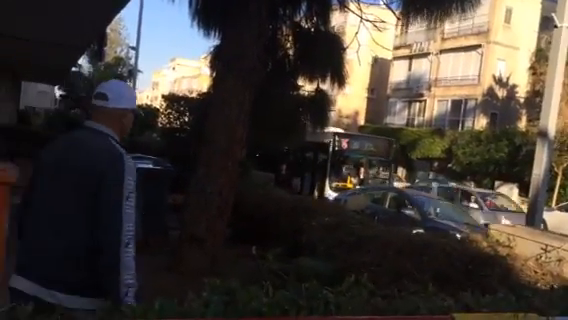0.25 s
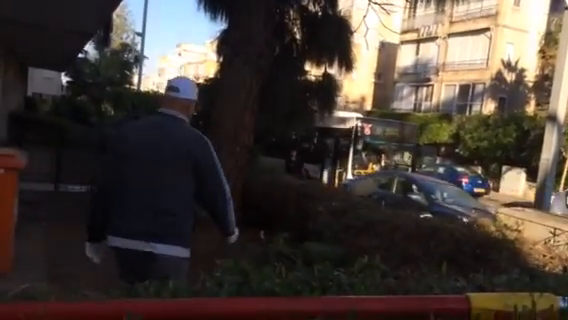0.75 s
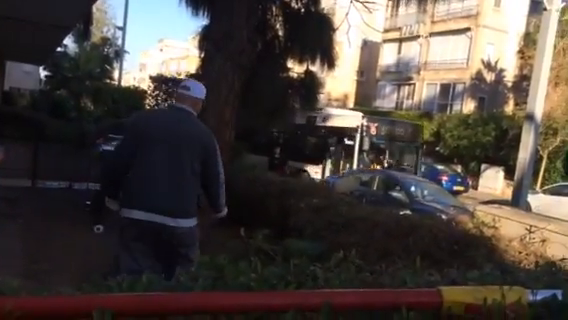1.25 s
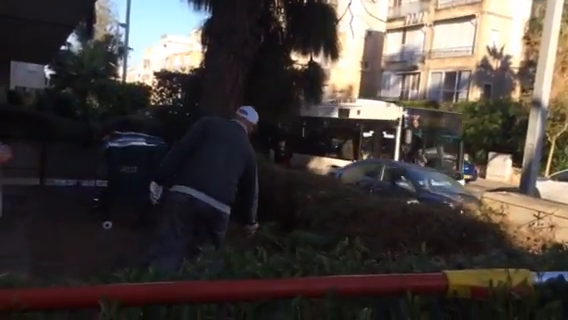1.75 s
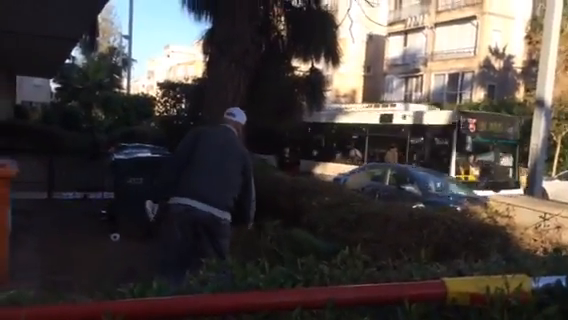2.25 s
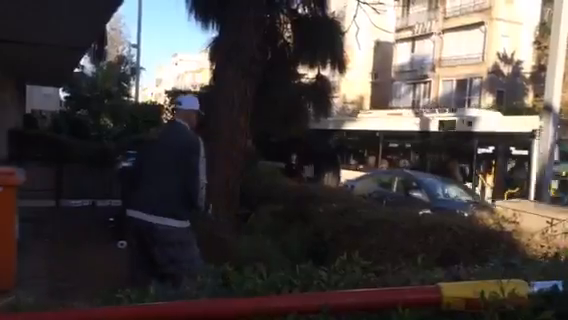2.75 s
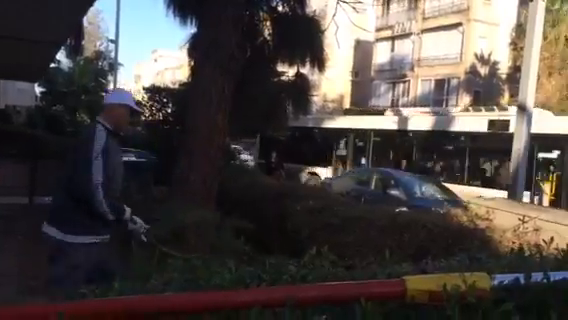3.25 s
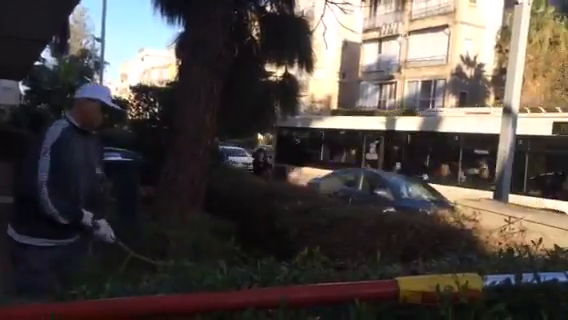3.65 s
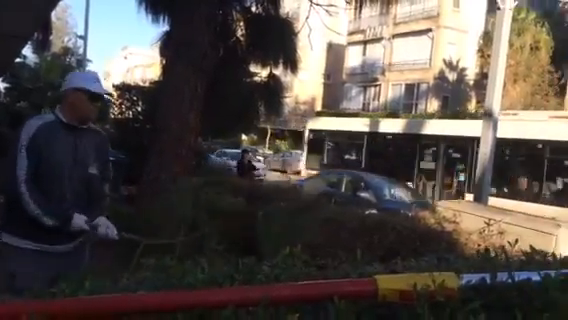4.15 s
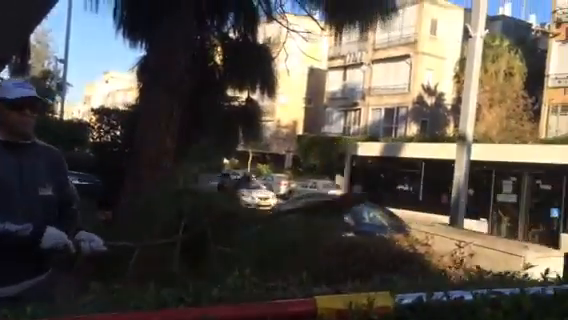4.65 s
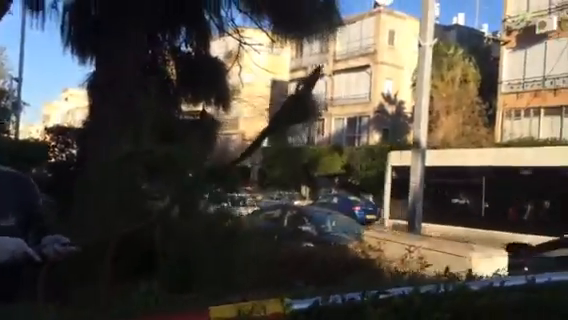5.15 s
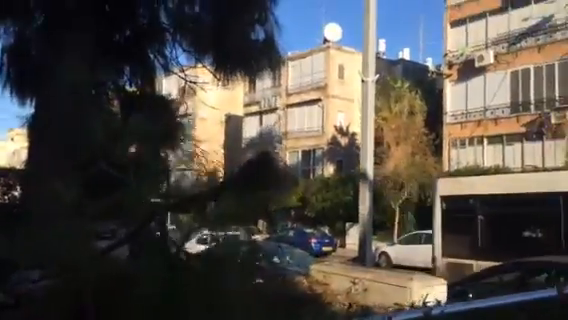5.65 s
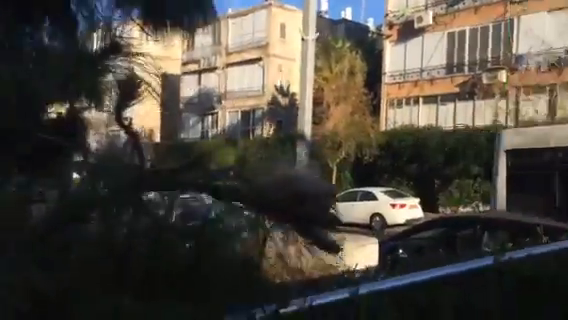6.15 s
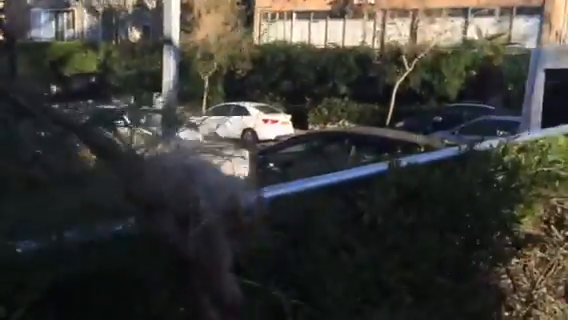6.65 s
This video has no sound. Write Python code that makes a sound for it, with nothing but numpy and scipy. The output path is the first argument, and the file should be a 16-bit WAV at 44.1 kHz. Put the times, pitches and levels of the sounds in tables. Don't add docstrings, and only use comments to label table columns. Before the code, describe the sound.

Outdoors on a city street, a diesel bus starts quietly, then its deep exhaust drone climbs in pitch and wavers through gear changes, with thin gear and intake whines. Dry twigs crack close to the microphone, mostly in the first couple of seconds. Car tyres hum and hiss, distant traffic washes underneath. Near six seconds a brake squeals briefly, then a brighter roar swells with small metallic knocks.

```python
import sys
import numpy as np
from scipy import signal
from scipy.io import wavfile
from scipy.ndimage import uniform_filter1d

SR = 44100
rng = np.random.default_rng(int(sys.argv[2]) if len(sys.argv) > 2 else 0)


def amplitude_ratio(level_db):
    exponent = np.asarray(level_db, float) / 20
    return 10 ** exponent


def log_audio(samples):
    frames = np.atleast_2d(samples).T
    limited = np.clip(frames, -1, 1)
    pcm = np.round(limited * 32767).astype(np.int16)
    wavfile.write(sys.argv[1], SR, pcm)


N = 304225
T = np.arange(N) / SR

# start_s, firing_hz, level_db
ENGINE = [(0, 27.5, -58), (.36, 28.5, -54), (.53, 38.52, -47), (.92, 50.93, -26.5), (1.1, 55.36, -33),
          (1.44, 58.3, -25), (2.31, 65.07, -23), (2.73, 65.84, -23.5), (3.05, 70.46, -30.5),
          (3.95, 72.2, -29), (4.44, 73.4, -31), (4.68, 69.5, -22.5), (5.0, 59.4, -32), (5.32, 58.45, -25),
          (5.78, 70.06, -25), (6.05, 58.2, -21), (6.28, 48.67, -32.5), (6.9, 49.35, -25.5)]
# middle_s, half_length_s, change_db
EXHAUST_NULLS = [
    (.7, .07, -11.5),
    (1.01, 0.06, -10),
    (1.63, 0.064, -4.5),
    (2.1, 0.17, -5),
    (2.2, 0.061, -13.5),
    (2.81, .05, -5.5),
    (2.885, 0.029, -19),
    (3.2, 0.21, -4.5),
    (4.15, 0.12, -1),
    (5.01, 0.074, -6.5),
]
# middle_s, half_length_s, change_db
SECOND_LIFTS = [(.11, 0.064, 10), (.27, 0.074, 15.5), (.39, 0.058, 16), (.54, 0.077, 16), (.86, 0.11, 13),
                (1.12, 0.091, 7), (1.3, 0.15, 14.5), (1.75, 0.39, 8), (2.3, .15, 5), (2.75, .1, 4.5),
                (3.2, 0.22, 2), (4.15, 0.18, 8.5), (4.78, 0.18, 4.5), (5.4, 0.091, 5.5), (5.8, .08, 5.5),
                (6.1, 0.088, 12.5), (6.3, .08, 4.5), (6.65, 0.24, 10.5), (6.88, .05, 8)]
# middle_s, half_length_s, change_db
THIRD_LIFTS = [(0, 0.072, 10), (.5, 0.21, 19), (.86, 0.08, 14.5), (1.1, .1, 8), (1.72, .12, 10),
               (2.35, .12, 2), (3.05, .06, 1), (5.05, .15, 8), (5.65, 0.092, 6), (5.93, 0.09, 11),
               (6.27, 0.18, 18), (6.85, .12, 18)]
# multiple_of_firing_rate, level_db
GEAR_MESH = [(47.7, 6.5), (71.6, 2), (95.4, -17), (143, -28)]
# middle_s, half_length_s, change_db
GEAR_LOADS = [
    (0, 0.94, 0),
    (2.5, .2, 6),
    (3.25, 0.46, 9),
    (4.45, 0.5, 7.5),
    (5.25, .2, 3),
    (5.5, .12, 5),
    (5.76, .14, 10.5),
    (6.03, .14, 6),
    (6.7, 0.39, 12),
]
# multiple_of_firing_rate, level_db
BLOWER = [(61.2, 4), (100, 4), (116.7, 2.5)]
# middle_s, half_length_s, change_db
BOOSTS = [
    (2.2, .3, 7),
    (2.7, .2, 2),
    (3.25, .35, 10),
    (3.8, 0.27, 7),
    (4.4, .6, 9),
    (5.2, 0.14, 7),
    (5.95, .2, 13),
    (6.8, .4, 14),
]
# start_s, level_db
ROAR = [(0, -41.5), (.88, -42), (1.25, -43.5), (2.1, -44), (2.33, -41), (2.55, -45), (2.94, -43.5),
        (3.07, -40), (4.36, -39), (4.6, -40.5), (4.95, -43.5), (5.2, -41.5), (5.6, -42), (6.21, -42),
        (6.45, -39), (6.67, -35), (6.9, -33.5)]
# pitch_hz, level_db (per Hz)
ROAR_COLOUR = [(140, -24), (230, 1), (316, -4.5), (363, -1), (411, -4), (594, -1.5), (648, -3), (759, -3),
               (1290, -7), (1510, -6.5), (1890, -10), (4400, -15.5), (5930, -20.5), (11200, -28.5),
               (15300, -35.5)]
# middle_s, half_length_s, treble_change_db
TREBLE_SPELLS = [
    (0, .1, -4),
    (.42, 0.26, 2),
    (5., .2, -1),
    (5.55, .2, 0.5),
    (6.15, 0.081, -0.5),
    (6.47, 0.12, 2),
]
# pitch_hz, level_db (per Hz)
RUMBLE_COLOUR = [(15, -43), (25, -56), (46, -3), (76, -4), (138, -5.5), (184, -15), (300, -24), (390, -78),
                 (660, -120)]
# middle_s, half_length_s, rumble_change_db
THUDS = [
    (.9, .25, 2),
    (1.5, 0.37, 3.5),
    (3.15, 0.098, 5),
    (5.45, 0.11, 5),
    (6.12, 0.14, 5),
    (6.65, 0.29, 3.5),
]
# start_s, centre_hz, level_db
INTAKE = [(0, 4520, -71), (1.13, 4770, -50.5), (1.52, 4680, -49.5), (2.09, 4650, -55), (2.36, 4570, -52.5),
          (4.53, 4350, -52.5), (4.99, 4352, -69.5), (5.69, 4500, -52.5), (6.24, 4494, -57),
          (6.69, 4740, -41.5), (6.9, 4670, -43.5)]
# multiple_of_centre, level_db
INTAKE_OVERTONES = [(1.5, -13), (2.16, -24)]
# middle_s, length_s, first_hz, last_hz, level_db
SQUEALS = [
    (2.7, 1.48, 5100, 5199, -63),
    (3.9, 1.1, 5160, 5370, -62),
    (4.55, .8, 5460, 5583, -61),
    (5.951, .27, 5400, 5350, -51.5),
    (5.98, .16, 7030, 6890, -62),
    (3.62, .22, 10950, 10950, -67),
    (6.451, 0.29, 7773, 7960, -64),
    (6.7, .14, 8105, 8150, -56),
]
# start_s, level_db
KNOCKS = [
    (6.714, -43),
    (6.8, -52),
    (6.842, -42),
]
# middle_s, length_s,
# centre_hz, level_db, width_hz
HUMS = [(0.36, 0.93, 930, -47, 250), (0.78, 1., 950, -43, 230), (1.15, .3, 995, -47, 260),
        (3.5, .35, 905, -50, 330), (0.7, 1.14, 271, -47, 46), (-0.5, 1.1, 460, -55, 43),
        (2, .27, 599, -49.5, 46.6), (3.5, .55, 590, -48, 39), (4.5, 1., 572, -49.5, 48),
        (4.5, .25, 556, -51, 40), (4, 2., 379, -52, 27), (4, 1.4, 1530, -53, 90),
        (6.5, .45, 3000, -48.5, 1000), (7, .35, 380, -41.5, 43), (6.5, .7, 420, -44, 270),
        (7, .4, 565, -42, 120), (6.72, 0.37, 798, -49, 40), (6.8, .4, 1510, -47.5, 130),
        (0.96, 3.6, 1500, -48.5, 1230), (7, 1.6, 3190, -44.5, 1860), (6.5, 1., 2340, -50.5, 296),
        (1, .9, 4880, -55, 240), (1.9, 1.8, 4830, -56.5, 270), (2.3, .5, 1500, -57, 1300)]
# middle_s, length_s, first_hz, last_hz, level_db
MOTORS = [(.1, 0.53, 152, 149.2, -40.5), (.6, .4, 146.9, 146, -44.5), (0.82, .5, 145, 150, -40.5),
          (4.05, 1.2, 119, 138, -40.5), (3.3, .9, 104, 116, -38), (4.3, 1.4, 110, 108, -41),
          (2.45, .6, 154, 146, -43), (5.9, .3, 148, 165, -39.5), (6.5, .25, 205, 207, -41.5),
          (6.66, .15, 208, 210, -42), (6.85, 0.51, 165, 158, -36.5)]
# start_s, peak_db, low_part_db
SNAPS = [(0.1481, -46, 0), (0.3556, -46, 15), (0.456, -50, 15), (1.1682, -40, -7), (1.3892, -39, 4),
         (1.4094, -49, 10), (1.4694, -46, 0), (1.4894, -42, -6), (1.832, -39, -6), (1.8595, -44, 3),
         (1.9188, -51, 4), (1.9919, -38, -10), (2.071, -46.5, 0), (2.2589, -45, 1), (2.4009, -40, -3),
         (5.4592, -45, -1), (6.4594, -44, 3), (6.7224, -37, -4), (6.8433, -35, 7)]
# pitch_hz, level_db (per Hz)
WASH_COLOUR = [(15, -44), (25, -8), (71, 1), (144, -1.5), (289, -33), (871, -19.5), (996, -21.5),
               (4260, -41), (12500, -43), (15500, -53)]


def bus():
    drone, turn = engine()
    roar_db, = curves(ROAR)
    return drone + body_roar(roar_db, turn) + intake(turn) + rumble(roar_db)


def engine():
    hz, drone_db = curves(ENGINE)
    hz = uniform_filter1d(hz, size=4000, mode="nearest")
    orders_db = [drone_db + spells(EXHAUST_NULLS), -46.5 + spells(SECOND_LIFTS), -57 + spells(THIRD_LIFTS)]
    turn = 2 * np.pi * np.cumsum(hz) / SR + 0.14 * drift(N, 1500)
    out = np.zeros(N)
    for order, db in enumerate(orders_db, start=1):
        out += amplitude_ratio(db) * np.sqrt(2) * np.sin(order * turn)
    shaft_hz = uniform_filter1d(hz, size=9000, mode="nearest")
    broken_db = 1.7 * drift(N, 4000)
    out += amplitude_ratio(-71 + spells(GEAR_LOADS) + broken_db) * whines(GEAR_MESH, shaft_hz, 100.0)
    out += amplitude_ratio(-80.5 + spells(BOOSTS)) * whines(BLOWER, shaft_hz, 72.0)
    return out, turn


def body_roar(roar_db, turn):
    far_db, close_db = -44.0, -39.0
    closeness_db = np.maximum(roar_db - close_db, 0)
    bright_db = 0.9 * closeness_db + spells(TREBLE_SPELLS) - 0.4
    boom_db = -0.48 * np.clip(roar_db - far_db, 0, close_db - far_db) + 2.5
    throb = np.clip(0.042 + 0.025 * closeness_db, 0, 1)
    roar = noise(ROAR_COLOUR, 0.54, bright_db, boom_db)
    return roar * amplitude_ratio(roar_db - 0.2) * (1 + throb * np.cos(turn))


def intake(turn):
    hz, db = curves(INTAKE)
    air = resonate(rng.standard_normal(N), hz, 430.0)
    air = evened(resonate(air, hz, 550.0))
    air += whines(INTAKE_OVERTONES, hz, 960.0)
    level_db = uniform_filter1d(db, size=3500) - 3.0 + 1.5 * drift(N, 1800)
    return amplitude_ratio(level_db) * air * (1 + 0.092 * np.cos(turn))


def rumble(roar_db):
    level_db = -40.5 + 0.42 * (roar_db + 44) + spells(THUDS) + 0.39 * spells(EXHAUST_NULLS)
    return amplitude_ratio(level_db) * noise(RUMBLE_COLOUR, 0.84, size=4096)


def squeals():
    out = np.zeros(N)
    for middle, length, first_hz, last_hz, db in SQUEALS:
        span, u, swell = passing(middle, length)
        hz = first_hz + (last_hz - first_hz) * (u + 1) / 2
        broken_db = 2.0 * drift(len(u), 2000)
        out[span] += amplitude_ratio(db + broken_db) * swell * whistle(hz, 95.0)
    return out


def knocks():
    out, t = np.zeros(N + 4000), np.arange(4000) / SR
    part_hz = 10950.0 + 0 * t
    decay_db = -60 * t / 0.11
    for start, db in KNOCKS:
        ring = whistle(part_hz, 90.0) + amplitude_ratio(2 + decay_db) * whistle(part_hz, 1800.0)
        out[round(start * SR):][:4000] += amplitude_ratio(db + decay_db) * np.minimum(t / 0.0042, 1) * ring
    return out[:N]


def snaps():
    out, t = np.zeros(N + 4000), np.arange(4000) / SR
    rise_s, t60_s = 0.0042, 0.033
    shape = amplitude_ratio(-60 * t / t60_s) * np.minimum(t / rise_s, 1)
    for start, peak_db, low_db in SNAPS:
        burst = rng.standard_normal(4000)
        crack = np.zeros(4000)
        for hz, db in ((5000, low_db), (9000, 0), (13000, -7.0)):
            band = resonate(resonate(burst, hz, 4700.0), hz, 4700.0)
            crack += amplitude_ratio(db) * evened(band)
        out[round(start * SR):][:4000] += amplitude_ratio(peak_db - 5.5) * crack * shape
    return out[:N]


def fuzzy_hums():
    out = np.zeros(N)
    for middle, length, hz, db, width in HUMS:
        span, u, swell = passing(middle, length)
        doppler = 1 - 0.02 * u * length / 2
        out[span] += amplitude_ratio(db) * swell * whistle(hz * doppler, width)
    return out


def motors():
    out = np.zeros(N)
    for middle, length, first_hz, last_hz, db in MOTORS:
        span, u, swell = passing(middle, length)
        waver_hz = 2.9 * drift(N, 400)[span]
        hz = first_hz + (last_hz - first_hz) * (u + 1) / 2 + waver_hz
        out[span] += amplitude_ratio(db) * swell ** 0.46 * np.sqrt(2) * np.sin(2 * np.pi * np.cumsum(hz) / SR)
    return out


def distant_traffic():
    return amplitude_ratio(-46.5) * noise(WASH_COLOUR, 1.8, size=2048)


def noise(colour, patchy_db, bright_db=0 * T, boom_db=0 * T, size=1024):
    frames, hz = 4 * N // size + 5, np.fft.rfftfreq(size, 1 / SR)
    a, b, patches = rng.standard_normal((frames, len(hz), 3)).T
    patches = uniform_filter1d(patches, size=10, axis=0)
    patches = evened(uniform_filter1d(patches, size=16, axis=1))
    f, db = np.transpose(colour)
    level_db = np.interp(np.log(hz + 1), np.log(f), db, left=-90, right=-90)[:, None]
    treble = np.clip(np.log2((hz + 1) / 3200.0), 0, 1)[:, None]
    bass = np.clip(np.log2(710.0 / (hz + 1)), 0, 1)[:, None]
    t = np.arange(frames) * size / 4 / SR
    tilt_db = treble * np.interp(t, T, bright_db) + bass * np.interp(t, T, boom_db)
    z = (a + 1j * b) * amplitude_ratio(level_db + patchy_db * patches + tilt_db)
    return evened(signal.istft(z, nperseg=size, noverlap=3 * size // 4)[1][:N])


def whines(rows, base_hz, width):
    return sum(amplitude_ratio(db) * whistle(multiple * base_hz, width) for multiple, db in rows)


def whistle(hz, width):
    step = 8
    count = len(hz) // step + 2
    pole = np.exp(-np.pi * np.median(width) * step / SR)
    sway = rng.standard_normal(count) + 1j * rng.standard_normal(count)
    sway = signal.lfilter([1], np.convolve([1, -pole], [1, -pole]), sway)
    sway = np.interp(np.arange(len(hz)) / step, np.arange(count), sway)
    return evened((sway * np.exp(2j * np.pi * np.cumsum(hz) / SR)).real)


def resonate(x, hz, width):
    turn = np.exp(2j * np.pi * np.cumsum(hz * np.ones(len(x))) / SR)
    r = np.exp(-np.pi * width / SR)
    return 2 * (turn * signal.lfilter([1 - r], [1, -r], x / turn)).real


def passing(middle, length):
    u = 2 * (T - middle) / length
    span = abs(u) < 1.2
    u_in = u[span]
    swell = amplitude_ratio(-16 * u_in ** 2) * np.clip((1.2 - abs(u_in)) / 0.18, 0, 1)
    return span, u_in, swell


def spells(rows):
    return sum(db * np.exp(-((T - middle) / half) ** 2) for middle, half, db in rows)


def curves(rows):
    s, *columns = np.transpose(rows)
    return [np.interp(T, s, c) for c in columns]


def drift(count, size):
    return evened(uniform_filter1d(rng.standard_normal(count), size=size))


def evened(x):
    return x / np.sqrt(np.mean(x ** 2) + 1e-20)


def scene():
    near = bus() + squeals() + knocks() + snaps()
    street = fuzzy_hums() + motors() + distant_traffic()
    return (near + street)[None]


def low_pass(x):
    return signal.sosfilt(signal.butter(12, 15340, fs=SR, output="sos"), x)


def record(dry):
    lift = amplitude_ratio(-16.0) * resonate(dry[0], 11600.0, 1750.0)
    heard = (dry[0] + lift)[None]
    return low_pass(heard)


dry = scene()
out = record(dry)
log_audio(out)
```